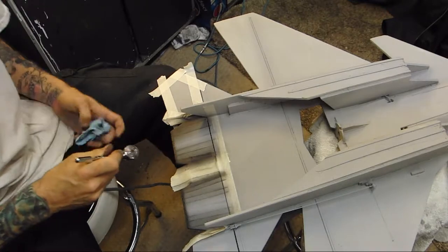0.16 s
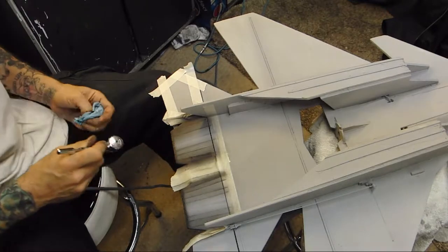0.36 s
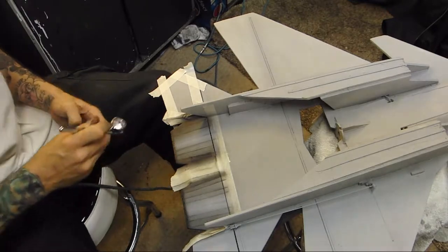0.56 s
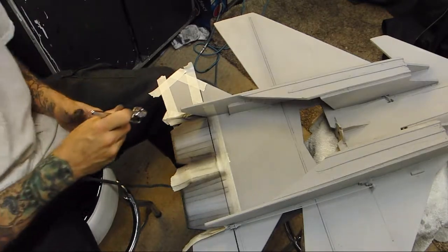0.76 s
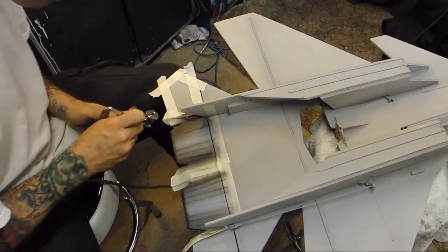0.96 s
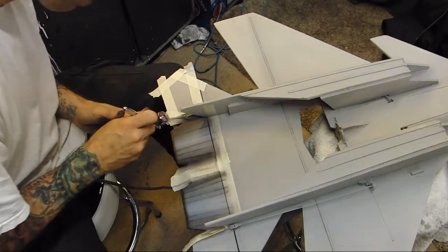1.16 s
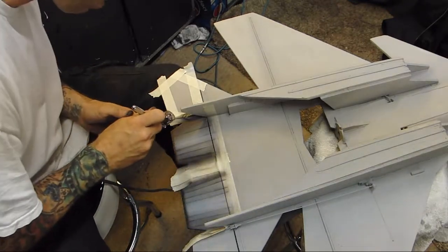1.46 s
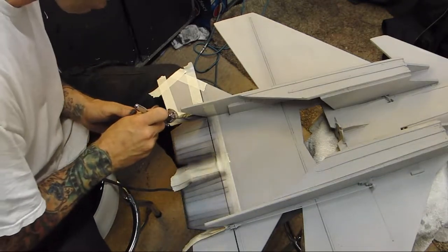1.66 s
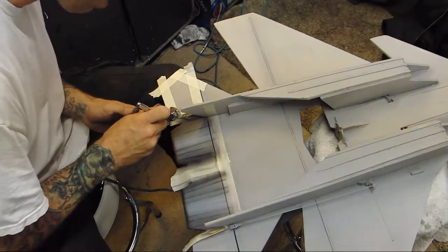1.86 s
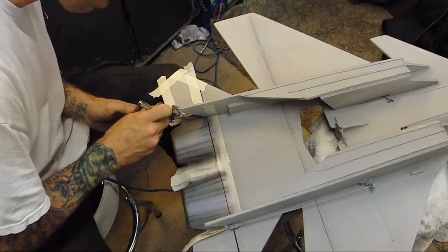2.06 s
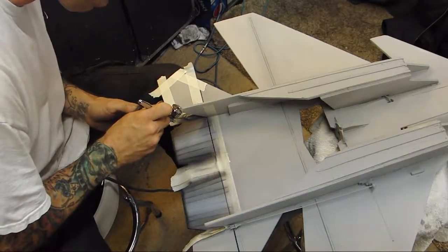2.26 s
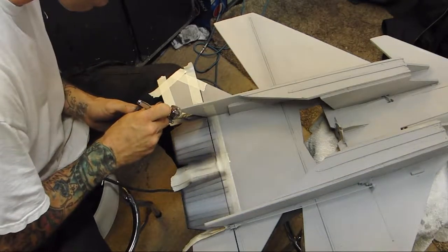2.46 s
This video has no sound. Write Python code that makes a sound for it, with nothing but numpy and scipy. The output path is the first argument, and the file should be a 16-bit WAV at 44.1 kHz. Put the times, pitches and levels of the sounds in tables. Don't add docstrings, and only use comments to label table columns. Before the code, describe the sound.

After nearly a second of low room hum and very faint cloth brushes, airbrush air bursts out, sags to a fine hiss, then swells louder and brighter against hollow plastic, with a short dull indoor tail.

```python
import sys
import numpy as np
from scipy import signal
from scipy.fft import rfft, irfft, next_fast_len
from scipy.io import wavfile
from scipy.ndimage import uniform_filter1d

SR = 44100
rng = np.random.default_rng(int(sys.argv[2]) if len(sys.argv) > 2 else 0)


def master_out(mix):
    frames = np.transpose(np.atleast_2d(mix))
    ceiling = np.clip(frames, -1, 1)
    pcm = np.round(ceiling * 32767).astype(np.int16)
    wavfile.write(sys.argv[1], SR, pcm)


def field_ratio(decibels):
    return 10 ** (np.asarray(decibels, dtype=float) / 20)


N = 114660
T = np.arange(N) / SR
HOP = 128
FRAMES, HZ = N // HOP + 9, np.fft.rfftfreq(4 * HOP, 1 / SR)
OPEN_S, OPEN_RISE_S = .9055, .005

# time in seconds, roar in dB, brightness in dB per octave.
APPROACH = [(1.08, -63, -1), (1.15, -48.5, -6), (1.21, -40, -3), (1.36, -37.5, -1), (1.47, -33, 2.5),
            (1.62, -29, 3.5), (1.82, -30, 1.5), (1.91, -30, -.5), (2.038, -27, -2), (2.11, -25.5, -1),
            (2.24, -23, 0.5), (2.28, -24.5, .5), (2.335, -28.5, 1.5), (2.385, -24.5, .5), (2.47, -24.5, 0),
            (2.53, -26.5, 0), (2.6, -29, -2)]


def evened(x):
    return x / np.sqrt(np.mean(x ** 2) + 1e-20)


def read(points, hz):
    f, value = np.transpose(points)
    return np.interp(np.log(hz + 1), np.log(f + 1), value)


def colour(x, db_of):
    size = next_fast_len(N + 4096)
    gain = field_ratio(db_of(np.fft.rfftfreq(size, 1 / SR)))
    return irfft(rfft(x, size) * gain, size)[..., :N]


def resonate(x, hz, width):
    turn = np.exp(2j * np.pi * hz * np.arange(len(x)) / SR)
    r = np.exp(-np.pi * width / SR)
    return 2 * (turn * signal.lfilter([1 - r], [1, -r], x / turn)).real


def resonate_twice(x, hz, width):
    return resonate(resonate(x, hz, width), hz, width)


def turbulence(shape_db, patchy_db, flicker_db):
    a, b, p = rng.standard_normal((FRAMES, len(HZ), 3)).T
    drifting = uniform_filter1d(p, size=7, axis=0)
    patches = evened(uniform_filter1d(drifting, size=14, axis=1))
    flicker = evened(uniform_filter1d(rng.standard_normal(FRAMES), size=3))
    spectra = (a + 1j * b) * field_ratio(shape_db + patchy_db * patches + flicker_db * flicker)
    return signal.istft(spectra, nperseg=4 * HOP, noverlap=3 * HOP)[1][:N]


def room_air():
    # frequency in Hz, level in dB.
    air_spectrum = [(15, -60), (25, -14), (70, -1), (512, -11), (1820, -16.5), (4080, -19.5), (4930, -24),
                    (6280, -26.5), (15700, -28)]
    # frequency in Hz, width in Hz, level in dB.
    whines = [(4770, 170, -70), (5050, 670, -73), (15734, 6, -91)]
    noise = rng.standard_normal(N)
    out = field_ratio(-56.5) * evened(colour(noise, lambda f: read(air_spectrum, f)))
    for hz, width, db in whines:
        out += field_ratio(db) * evened(resonate_twice(rng.standard_normal(N), hz, width))
    return out


def puffs():
    # start in seconds, frequency in Hz, width in Hz, length in seconds, level in dB.
    bursts = [
        (.910, 3000, 900, .003, -41),
        (.555, 1900, 700, .045, -61),
        (.24, 2400, 1200, .06, -68),
    ]
    knock_hz, knock_db, knock_t60_s = 150, -42, .075
    since = np.maximum(T - OPEN_S - OPEN_RISE_S / 2, 0)
    out = field_ratio(knock_db - 60 * since / knock_t60_s) * np.sin(2 * np.pi * knock_hz * since)
    for start, hz, width, length, db in bursts:
        noise = resonate_twice(rng.standard_normal(N), hz, width)
        swell = np.sin(np.pi * np.clip((T - start) / length, 0, 1))
        out += field_ratio(db) * swell * evened(noise)
    return out


def hollow():
    # frequency in Hz, width in Hz, level in dB.
    body_modes = [(575, 40, -5), (655, 55, -1), (770, 16, -2), (925, 80, -2)]
    wake_s, rise_s = 1.01, .1
    level_db, share = -47.5, .083
    s, roar_db, _ = np.transpose(APPROACH)
    drive = rng.standard_normal(N)
    boom = sum(field_ratio(db) * evened(resonate_twice(drive, hz, 2 * width)) for hz, width, db in body_modes)
    reach = np.clip((T - wake_s) / rise_s, 0, 1)
    return reach * field_ratio(level_db + share * (np.interp(T, s, roar_db) + 31)) * evened(boom)


def shell():
    # frequency in Hz, level in dB.
    roar = [(450, -40), (600, -21), (1000, -6), (1500, -6), (2300, 0.5), (3600, -0.5), (5200, -9),
            (7500, -19)]
    # frequency in Hz, width in Hz, level in dB.
    resonances = [(890, 27, -2.5), (1225, 110, -12), (1600, 95, -8), (1870, 65, -1), (2350, 300, -3.5),
                  (3064, 130, -2.5), (3440, 160, -5.5), (3630, 65, -2), (4440, 45, -36), (4230, 33, -28),
                  (4760, 88, -6), (5080, 120, -6.5)]
    rings_db, level_db = -2.5, .61
    s, roar_db, tilt = np.transpose(APPROACH)
    brightness = np.interp(np.arange(FRAMES) * HOP / SR, s, np.clip(tilt, -4, 4))
    octaves = np.log2(np.maximum(HZ[:, None], 700) / 1800)
    shape_db = read(roar, HZ)[:, None] + octaves * brightness
    rms = np.sqrt(np.mean(field_ratio(2 * shape_db), axis=0))
    jet = evened(turbulence(shape_db - 20 * np.log10(rms), patchy_db=.5, flicker_db=-.26))
    rings = sum(field_ratio(db - read(roar, hz)) * resonate(jet, hz, width) for hz, width, db in resonances)
    reach = np.clip((T - s[0]) / .06 + 1, 0, 1)
    return reach * field_ratio(level_db + np.interp(T, s, roar_db)) * evened(jet + field_ratio(rings_db) * rings)


def nozzle():
    # time in seconds, flow in dB.
    flow = [
        (.92, -42),
        (1.06, -44.5),
        (1.35, -43),
        (1.45, -42.5),
        (1.6, -40.5),
        (2.0, -38),
        (2.6, -40.5),
    ]
    # frequency in Hz, level in dB.
    hiss_spectrum = [(120, -14), (500, -5.5), (1300, -14.5), (3300, -7.5), (6500, -8.5), (9800, -10),
                     (12300, -1), (15700, -5)]
    level_db = 3.63
    leak_db, leak_s = -24, .008
    surge_db, surge_s = 6, .059
    surge_top_db, surge_top_hz = 1.5, 10600
    s, flow_db = np.transpose(flow)
    leak = field_ratio(leak_db) * np.exp(-abs(T - OPEN_S) / leak_s)
    gate = np.clip((T - OPEN_S) / OPEN_RISE_S, 0, 1) ** 2 + leak
    surge = np.exp(-abs(T - OPEN_S - 2 * OPEN_RISE_S) / surge_s)
    hiss = evened(turbulence(read(hiss_spectrum, HZ)[:, None], patchy_db=.4, flicker_db=.5))
    top = colour(hiss, lambda f: -10 * np.log10(1 + (surge_top_hz / (f + 1)) ** 12))
    bright_hiss = hiss + (field_ratio(surge_top_db * surge) - 1) * top
    return gate * field_ratio(level_db + np.interp(T, s, flow_db) + surge_db * surge) * bright_hiss


def room(x):
    echo_db, t60_s, low_hz, top_hz = -4.5, .15, 1200, 4900
    t = np.arange(SR // 4) / SR
    tail = rng.standard_normal(len(t)) * field_ratio(-60 * t / t60_s) * (t > .003)
    wet = signal.fftconvolve(x, tail / np.linalg.norm(tail))[:N]

    def dull(f):
        return -10 * np.log10(1 + (f / top_hz) ** 6 + (low_hz / (f + 1)) ** 4)
    return x + field_ratio(echo_db) * colour(wet, dull)


def scene():
    in_room = room(nozzle() + shell() + puffs())
    return (in_room + hollow() + room_air())[None]


def roll_off(x):
    return signal.sosfilt(signal.butter(12, 17010, fs=SR, output="sos"), x)


def record(dry):
    # frequency in Hz, width in Hz, depth in dB.
    notches = [(4050, 150, -15), (6250, 450, -13), (7800, 330, -10.5), (10150, 400, -11)]
    edge_hz, edge_fall_hz = 15740, 70

    def housing(f):
        dips = sum(db / (1 + ((f - hz) / (.5 * width)) ** 2) for hz, width, db in notches)
        return dips - 90 * np.clip((f - edge_hz) / edge_fall_hz, 0, 1)
    return roll_off(colour(dry, housing))


dry = scene()
out = record(dry)
master_out(out)
```